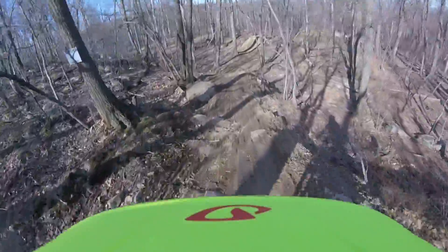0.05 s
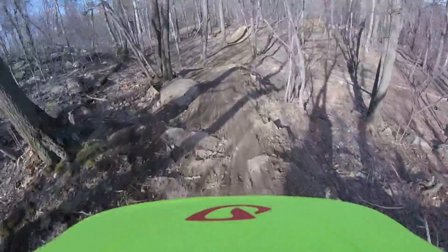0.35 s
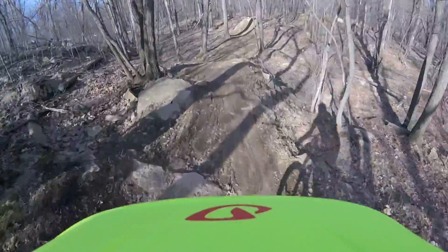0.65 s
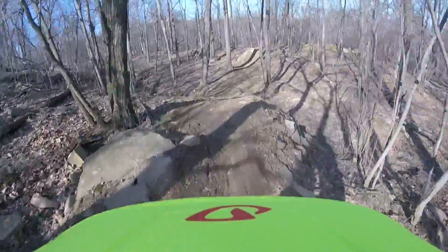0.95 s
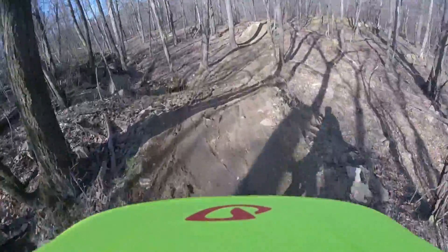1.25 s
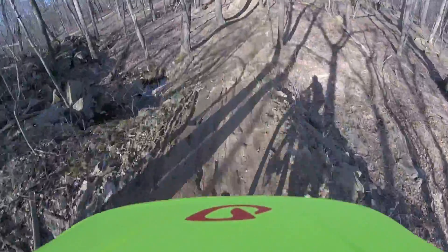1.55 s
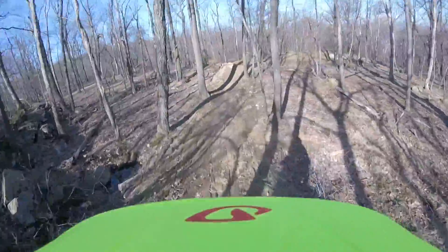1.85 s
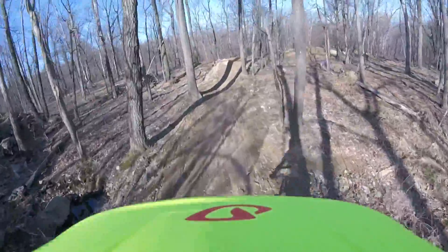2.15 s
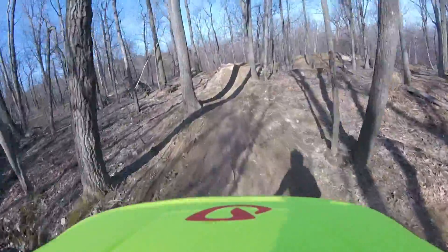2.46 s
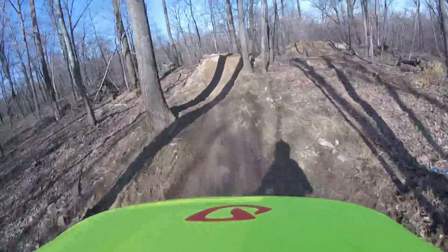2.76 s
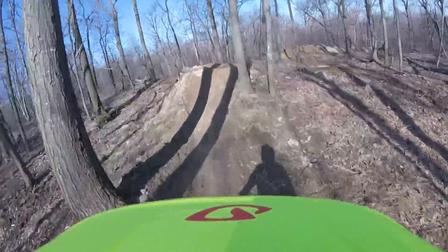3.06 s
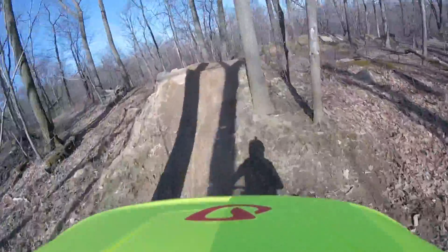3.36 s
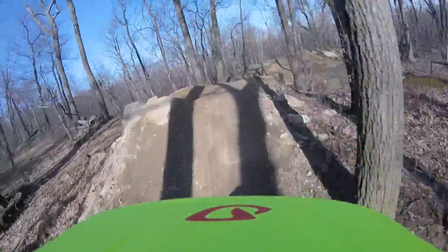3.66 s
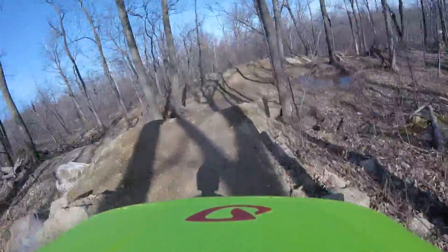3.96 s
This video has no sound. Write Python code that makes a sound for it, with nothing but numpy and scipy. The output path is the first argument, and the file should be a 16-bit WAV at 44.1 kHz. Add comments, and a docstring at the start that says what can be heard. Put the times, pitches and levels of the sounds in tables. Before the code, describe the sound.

Wind buffets a helmet microphone as a mountain bike rolls down a woodland dirt trail. Tyres hum, crunch and knock on stones while the chain clacks lightly, then the wind grows into a rough, booming rush.

```python
"""A mountain bike rolls down a dirt trail in the woods, heard from the rider's helmet.
At first the knobbly tyres hum, crunch over grit and dry leaves and knock on stones, while
eddies buffet the microphone and chain and frame clack on the bumps. After two seconds the bike
has gathered speed: the wind tears into a rough rush and the tyres scrape sideways.
In the last second strong gusts make the helmet boom, drone and whistle."""
import sys
import numpy as np
from scipy import signal
from scipy.fft import rfft, irfft
from scipy.io import wavfile
from scipy.ndimage import uniform_filter1d

SR = 44100
rng = np.random.default_rng(int(sys.argv[2]) if len(sys.argv) > 2 else 0)


def int16_out(signal):
    """Quantize to a 16-bit WAV file."""
    q = np.round(np.clip(np.atleast_2d(signal).T, -1, 1) * 32767)
    wavfile.write(sys.argv[1], SR, q.astype(np.int16))


N = 176400
TIME = np.arange(N) / SR

# Envelopes of the continuous noises. Each row: time in seconds, relative level in dB.
BUFFET_LEVEL = [(0.0, -32.5), (0.4, -28.5), (0.42, -21), (0.48, -31), (0.52, -30.5), (0.6, -33),
                (0.99, -30.5), (1.11, -19.5), (1.22, -28.5), (1.31, -28), (1.48, -26), (1.65, -27.5),
                (1.7, -33.5), (1.74, -21), (1.86, -31.5), (1.9, -25.5), (1.97, -25.5), (2.235, -27.5),
                (2.255, -12), (2.35, -19), (2.415, -16), (2.44, -19.5), (2.675, -21.5), (2.697, -16.5),
                (2.75, -20), (3.01, -30.5), (3.1, -19), (3.26, -25), (3.3, -15), (3.33, -22.5),
                (3.63, -23.5), (3.695, -11.5), (3.8, -29.5), (3.845, -19), (3.89, -25.5), (4.0, -27.5)]
RUSH_LEVEL = [(1.82, -44.5), (1.93, -37.5), (1.97, -49), (2.08, -39), (2.16, -34.5), (2.243, -39.5),
              (2.258, -29.5), (2.45, -31.5), (2.5, -37), (2.6, -32), (2.635, -36), (2.685, -37),
              (2.71, -34), (2.765, -39), (3.03, -43.5), (3.08, -32.5), (3.155, -35), (3.21, -37.5),
              (3.32, -34.5), (3.35, -42.5), (3.5, -25.5), (3.565, -37.5), (3.66, -25), (3.71, -29.5),
              (3.79, -33.5), (3.89, -32), (3.945, -44), (4, -33)]
GRIT_LEVEL = [(0, -50.5), (.12, -48.5), (.2, -50), (.3, -46), (.47, -47), (.57, -44), (.74, -45),
              (.81, -42.5), (.93, -43.5), (1.12, -40.5), (1.31, -45), (1.36, -46), (1.44, -48),
              (1.54, -48.5), (1.585, -57), (1.665, -48), (1.73, -42.5), (1.755, -43), (1.79, -54),
              (1.83, -54), (1.865, -45.5), (1.94, -49.5), (2.52, -44.5), (2.72, -41), (2.96, -47.5),
              (3.13, -43), (3.39, -46), (3.45, -43), (3.9, -39), (4, -45.5)]
LEAF_LEVEL = [(0.0, -55), (.2, -55.5), (0.68, -55), (1.01, -53), (1.55, -55.5), (1.6, -57.5), (1.69, -57),
              (1.74, -50), (1.8, -57), (1.86, -56.5), (2.64, -54.5), (3.02, -56), (3.4, -56), (3.71, -52),
              (4.0, -55.5)]
RASP_LEVEL = [(0, -58), (.15, -48.5), (.3, -50.5), (.47, -63), (.6, -52.5), (.7, -44), (.83, -44),
              (1.0, -53.5), (1.15, -50.5), (1.35, -66), (1.55, -72)]
# Gliding tones of helmet and tread. Each row: time in seconds, pitch in Hz, relative level in dB.
HELMET_BOOM = [(3.04, 180, -37), (3.11, 180.7, -23), (3.152, 184.6, -17.5), (3.19, 179.4, -34),
               (3.41, 176.3, -36.5), (3.44, 175.3, -23), (3.5, 190.4, -21.5), (3.58, 176.5, -24),
               (3.69, 188.6, -24), (3.8, 187.9, -36), (3.86, 201.2, -31), (3.92, 196, -44)]
HELMET_DRONE = [(3.03, 440, -59), (3.08, 426.3, -26), (3.17, 411.3, -34.5), (3.26, 378, -29.5),
                (3.34, 287.2, -32), (3.42, 306.4, -35.5), (3.52, 365.7, -30), (3.58, 328, -39),
                (3.66, 371, -26), (3.765, 401.5, -29), (3.79, 426.6, -47), (3.87, 450, -48),
                (3.95, 446, -48)]
VISOR_WHISTLE = [(3.09, 1000, -65), (3.14, 990, -28), (3.185, 960, -35.5), (3.21, 950, -42),
                 (3.395, 880, -50), (3.42, 890, -31), (3.51, 930, -28.5), (3.56, 1020, -45),
                 (3.68, 950, -37.5), (3.75, 850, -48), (3.78, 819, -33), (3.84, 930, -33),
                 (3.9, 933, -33.5), (3.95, 920, -56)]
TREAD_HUM = [(0, 185.8, -55), (.3, 200.8, -37.5), (.55, 206, -43.5), (.8, 216.4, -37.5), (1.05, 224, -33),
             (1.35, 226.8, -55.5), (2, 243, -48), (2.75, 262.4, -33), (3.2, 237, -53), (4, 225.7, -48)]
# Bursts of noise. Each row: start in seconds, length in seconds, level in dB.
AIR_BLASTS = [(1.94, 0.021, -32), (1.967, 0.0091, -23.5), (2.017, 0.018, -24.5), (2.249, .014, -15.5),
              (2.274, 0.0097, -19), (2.321, 0.013, -19), (2.345, 0.022, -18), (2.382, 0.021, -21.5),
              (2.41, 0.0049, -14), (2.45, .016, -19), (2.689, 0.031, -19), (3.106, .012, -22.5),
              (3.135, 0.018, -21.5), (3.172, .014, -23)]
TYRE_SCRAPES = [(2.457, .012, -29.5), (2.522, 0.025, -25), (2.598, 0.0099, -24.5), (2.705, 0.017, -30),
                (2.726, 0.016, -26), (3.252, .022, -33), (3.312, 0.024, -30.5)]
# Stones under the tyres. Each row: start in seconds, relative level in dB, pitch in Hz.
STONE_KNOCKS = [(.333, -26.5, 1310), (.556, -28, 1481), (.606, -28, 980), (.624, -27.5, 2260),
                (.758, -26, 1500), (.773, -23.5, 1310), (.783, -38, 2600), (.806, -26, 1420),
                (.823, -21, 1640), (.831, -24, 1630), (.895, -27, 1680), (.955, -23.5, 700),
                (.998, -22.5, 1400), (1.024, -32, 2600), (1.078, -21.5, 1593), (1.133, -20.5, 1300),
                (1.182, -36, 1700), (1.32, -35, 700), (1.347, -22.5, 920), (1.418, -31, 1500),
                (1.518, -25.5, 1130), (1.847, -33, 1618), (2.02, -32, 650), (2.05, -27, 750),
                (2.075, -39, 1200), (2.132, -24.5, 1600)]
# Impacts on the bike. Each row: start in seconds, relative level in dB.
CHAIN_CLACKS = [(.039, -36), (.307, -41), (.383, -39.5), (.53, -40), (.872, -37), (1.026, -37), (1.24, -41),
                (1.351, -56), (1.515, -32.5), (1.546, -35.5), (1.978, -41), (2.108, -31.5), (2.222, -43),
                (2.857, -35), (3.358, -36.5), (3.466, -38.5), (3.878, -36), (3.911, -40)]
FRAME_THUDS = [(.328, -19.5), (1.043, -18.5), (2.254, -11)]
METAL_PINGS = [(.346, -52), (.794, -57), (1.093, -60), (1.242, -57), (1.415, -62), (1.463, -57),
               (1.517, -49), (1.55, -61), (1.676, -49.5), (1.779, -55.5), (1.873, -53), (1.995, -55),
               (2.226, -60), (2.555, -58)]
# Modes of wheel and frame. Each row: frequency in Hz, bandwidth in Hz, relative gain in dB.
BIKE_MODES = [(909, 28, -0.5), (1383, 38, 1), (1640, 93, 4.5), (2620, 56, -9)]
# Spectra of the sources. Each row: frequency in Hz, relative spectral density in dB.
BUFFET_SPECTRUM = [(12, -17), (25, -6.5), (40, -1.5), (67, -1.5), (105, -5.5), (170, -12.5), (260, -19.5),
                   (450, -33), (1000, -49), (3000, -93), (12000, -110)]
RUSH_SPECTRUM = [(80, -25), (170, 4), (300, -3), (480, -5.5), (700, -8.5), (950, -14.5), (1500, -17.5),
                 (2000, -22), (3000, -39.5), (4000, -45.5), (6000, -53), (9000, -74), (14000, -101.5)]
BLAST_SPECTRUM = [(60, -11), (170, 9.5), (300, 0), (500, 0.5), (800, -6), (1250, -12), (1800, -21.5),
                  (3000, -36.5), (4000, -52.5), (6000, -48.5), (12000, -82)]
GRIT_SPECTRUM = [(100, 10.5), (300, 11), (600, 4.5), (900, 0), (1250, 1), (1700, -8), (2150, -7),
                 (3000, -9), (3800, -18), (5000, -15.5), (6500, -36.5), (10000, -54), (13500, -34.5)]
LEAF_SPECTRUM = [(1000, 1.5), (3000, -6), (4000, -25.5), (4600, -2), (5800, -1), (6300, -11.5), (7700, -15),
                 (8250, -16.5), (8700, -19.5), (11000, -27), (13500, -38.5)]
STONE_SPECTRUM = [(100, -9.5), (400, -6.5), (1300, -2.5), (2100, -3.5), (3100, -6), (3900, -19.5),
                  (5300, -11), (6600, -33), (13000, -46)]
SCRAPE_SPECTRUM = [(200, 3), (450, 6), (900, -4), (1600, -3), (2200, -11), (3100, -21), (3900, -31.5),
                   (5200, -20.5), (6600, -44), (12000, -80)]
CLACK_SPECTRUM = [(300, 9.5), (1500, -19), (2900, 6), (3800, -7), (4700, 7.5), (5800, 5), (6500, -11),
                  (8300, -29), (9500, -24), (14000, -48)]
THUD_SPECTRUM = [(30, -6), (90, 1.5), (180, -2.5), (300, -15), (600, -26), (1500, -41.5), (4000, -58),
                 (12000, -87)]
PING_SPECTRUM = [(4000, -35), (6000, -15), (7800, -22.5), (8050, 1), (8250, -5), (8500, -17), (9400, -22.5),
                 (10000, -26), (14000, -40)]


def wind(build_db_per_s=56):
    """Turbulence: eddies press on the microphone, and at speed each sheds a puff of brighter noise."""
    buffet_db, = curves(BUFFET_LEVEL)
    rush_db, = curves(RUSH_LEVEL)
    rush_db -= build_db_per_s * np.maximum(RUSH_LEVEL[0][0] - TIME, 0)  # fade in to the first row
    eddies = evened(coloured(rng.standard_normal(N), BUFFET_SPECTRUM), window_s=0.06)
    puffs = unit_power(from_db(3 * np.minimum(np.abs(eddies), 2.5) + 2.3 * drift(54)))
    rush = evened(coloured(puffs * rng.standard_normal(N), RUSH_SPECTRUM), window_s=0.03)
    buffet = from_db(buffet_db + 3 + 1.9 * drift(32)) * eddies
    return buffet + from_db(rush_db + 5 + drift(19)) * rush


def helmet_tones():
    """Flow-excited resonance: gusts sound the helmet's shell, its openings and the visor's edge."""
    boom = air_tone(HELMET_BOOM, width_hz=50)
    drone = air_tone(HELMET_DRONE, width_hz=105)
    return boom + drone + air_tone(VISOR_WHISTLE, width_hz=200)


def air_blasts():
    """Unsteady flow: bumps jerk the helmet and set off short blasts of air."""
    return bursts(AIR_BLASTS, BLAST_SPECTRUM, rough_db=3.5)


def tyres():
    """Rolling noise: leaves hiss and grit crunches, driving the modes of wheel and frame."""
    grit = fractures(GRIT_LEVEL, GRIT_SPECTRUM, per_s=700, spread_db=2.5, clump_db=2.35, smooth=0.83)
    leaves = fractures(LEAF_LEVEL, LEAF_SPECTRUM, per_s=500, spread_db=0, clump_db=1.4, smooth=1.6)
    ring = sum(from_db(db) * resonance(grit, hz, width) for hz, width, db in BIKE_MODES)
    return from_db(8.5) * (grit + ring) + from_db(3.5) * leaves


def tread_hum():
    """Periodic excitation: the tread knobs strike the ground in turn and give a rough hum."""
    hz, db = curves(TREAD_HUM)
    phase = 2 * np.pi * np.cumsum(hz * (1 + 0.048 * drift(26.54))) / SR
    tone = unit_power(np.sin(phase) + 0.12 * np.sin(2 * phase))
    return from_db(db + 2 + 1.75 * drift(10)) * tone


def rasp():
    """Forced vibration: steady rubbing keeps the modes of wheel and frame ringing."""
    level_db, = curves(RASP_LEVEL)
    rubbing = rng.standard_normal(N)
    ring = sum(from_db(db) * resonance(resonance(rubbing, hz, 2 * width), hz, 2 * width)
               for hz, width, db in BIKE_MODES)
    return from_db(level_db) * unit_power(ring)


def stones():
    """Free vibration: each struck stone cracks and rings briefly at its own pitch."""
    knocks = np.zeros(N)
    for start, db, hz in STONE_KNOCKS:
        hit = from_db(db - 11.5) * contact(start, t60_s=0.045, crack=7.9)
        knocks += hit + from_db(9) * resonance(hit, hz, width_hz=117)
    return coloured(knocks, STONE_SPECTRUM)


def scrapes():
    """Sliding friction: the tyres slip sideways for an instant."""
    return bursts(TYRE_SCRAPES, SCRAPE_SPECTRUM, rough_db=2.5)


def bike_rattle():
    """Impact noise: on the bumps the chain clacks, the frame thuds and small metal parts ping."""
    clacks = impacts(CHAIN_CLACKS, CLACK_SPECTRUM, t60_s=0.061, crack=5.2, gain_db=-2.5)
    thuds = impacts(FRAME_THUDS, THUD_SPECTRUM, t60_s=0.014, crack=42, gain_db=-6)
    pings = impacts(METAL_PINGS, PING_SPECTRUM, t60_s=0.045, crack=13, gain_db=-8.5)
    return clacks + thuds + pings


def air_tone(rows, width_hz, upper_ratio=1.65, fade_db_per_s=200):
    """Narrow-band noise: a gliding tone and a weaker upper mode vary in amplitude and phase."""
    hz, db = curves(rows)
    outside_s = np.abs(TIME - np.clip(TIME, rows[0][0], rows[-1][0]))
    phase = 2 * np.pi * np.cumsum(hz) / SR
    lower, upper = (drift(width_hz / 2) * np.cos(k * phase) + drift(width_hz / 2) * np.sin(k * phase)
                    for k in (1, upper_ratio))
    tone = evened(lower + from_db(-11) * upper, window_s=0.03)
    return from_db(db - fade_db_per_s * outside_s) * tone


def bursts(rows, spectrum, rough_db, attack_s=0.0044, release_s=0.0042):
    """Amplitude modulation: rough noise rises quickly, holds and dies away."""
    envelope = np.zeros(N)
    for start, length, db in rows:
        attack = np.clip((TIME - start) / attack_s, 0, 1)
        release = np.exp(-np.maximum(TIME - start - length, 0) / release_s)
        envelope += from_db(db) * attack * release
    noise = coloured(from_db(rough_db * drift(200)) * rng.standard_normal(N), spectrum)
    return envelope * evened(noise, window_s=0.022)


def fractures(levels, spectrum, per_s, spread_db, clump_db, smooth):
    """Shot noise: tiny random fractures over a smooth rolling noise, both swelling in clumps."""
    level_db, = curves(levels)
    clumps = from_db(clump_db * drift(31))
    sizes = from_db(spread_db * np.minimum(rng.exponential(1, N), 4)) * rng.choice([-1, 1], N)
    clicks = unit_power(sizes * (rng.random(N) < per_s / SR))
    force = unit_power(clumps * (clicks + smooth * rng.standard_normal(N)))
    return coloured(force * from_db(level_db), spectrum)


def impacts(rows, spectrum, t60_s, crack, gain_db):
    """Source and filter: the response of one body colours every contact on it."""
    force = sum(from_db(db + gain_db) * contact(start, t60_s, crack) for start, db in rows)
    return coloured(force, spectrum)


def contact(start_s, t60_s, crack):
    """Damping: an impulse of height `crack`, then a rattle that falls 60 dB in t60_s."""
    age = TIME[:SR // 5]
    hit = rng.standard_normal(len(age)) * from_db(-60 * age / t60_s)
    hit[0] = crack
    return np.pad(hit, (int(start_s * SR), N))[:N]


def resonance(x, hz, width_hz):
    """Damped oscillator: a two-pole band-pass with unit peak gain."""
    radius = np.exp(-np.pi * width_hz / SR)
    feedback = [1, -2 * radius * np.cos(2 * np.pi * hz / SR), radius ** 2]
    return signal.lfilter(np.array([1, 0, -1]) * (1 - radius ** 2) / 2, feedback, x)


def coloured(x, spectrum):
    """Minimum-phase filtering: imposes a spectrum causally, with unit power gain."""
    hz, db = np.transpose(spectrum)
    bin_hz = np.arange(N + 1) * SR / (2 * N)
    gain = unit_power(from_db(np.interp(np.log(bin_hz + 1), np.log(hz), db)))
    cepstrum = irfft(np.log(gain))
    cepstrum[1:N] *= 2  # fold onto positive time
    cepstrum[N + 1:] = 0
    return irfft(rfft(x, 2 * N) * np.exp(rfft(cepstrum)))[:N]


def drift(rate_hz, step=40, settle=2000):
    """Random fluctuation: low-passed noise of unit power."""
    pole = np.exp(-2 * np.pi * step * rate_hz / SR)
    noise = rng.standard_normal(N // step + settle + 2)
    slow = signal.lfilter([1], [1, -2 * pole, pole ** 2], noise)[settle:]
    return np.interp(np.arange(N) / step, np.arange(len(slow)), unit_power(slow))


def evened(x, window_s):
    """Running normalisation: removes slow swings of level and leaves the fast ones."""
    return x / np.sqrt(uniform_filter1d(x * x, int(window_s * SR)) + 1e-12)


def curves(rows):
    """Linear interpolation: one curve in time for each column after the first."""
    times, *columns = np.transpose(rows)
    return [np.interp(TIME, times, column) for column in columns]


def unit_power(x):
    """Normalisation to a mean square of one."""
    return x / np.sqrt(np.mean(x ** 2) + 1e-20)


def from_db(db):
    """Amplitude ratio of a level in decibels."""
    return 10 ** (np.asarray(db) / 20)


def scene():
    """Superposition: air, trail and rattling bike add in one channel."""
    air = wind() + helmet_tones() + air_blasts()
    trail = tyres() + tread_hum() + rasp() + stones() + scrapes()
    return (air + trail + bike_rattle())[None]


def record(dry):
    """Saturation rounds the peaks; a steep low-pass removes the highest treble."""
    stopband_hz = 14300
    lowpass = signal.cheby2(12, 70, stopband_hz, fs=SR, output="sos")
    return signal.sosfilt(lowpass, 0.73 * np.tanh(dry / 0.94))


dry = scene()
out = record(dry)
int16_out(out)
```